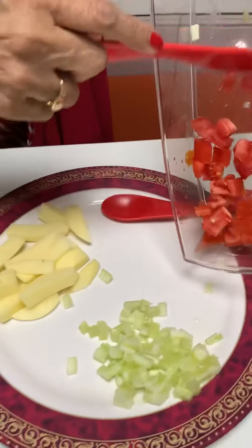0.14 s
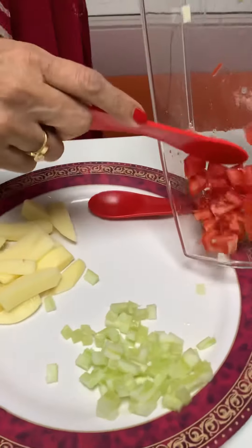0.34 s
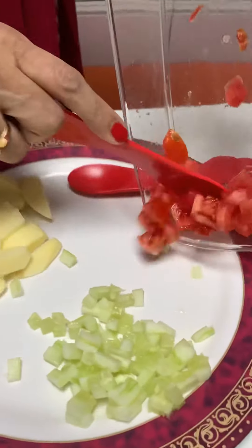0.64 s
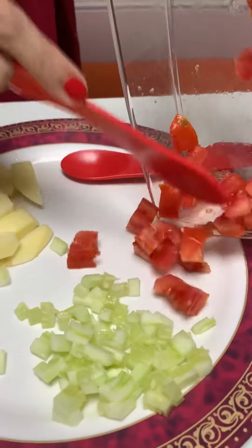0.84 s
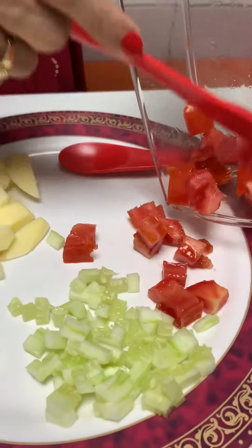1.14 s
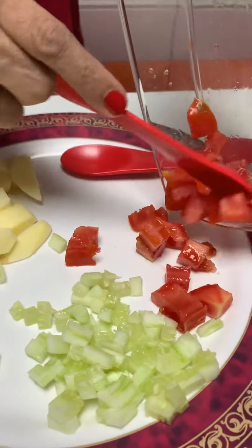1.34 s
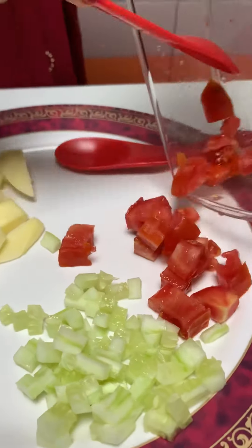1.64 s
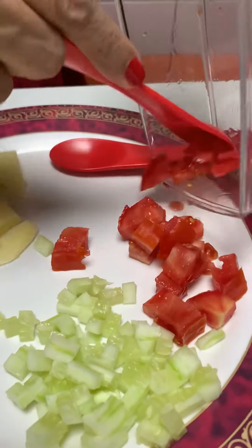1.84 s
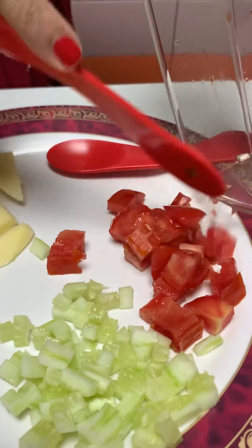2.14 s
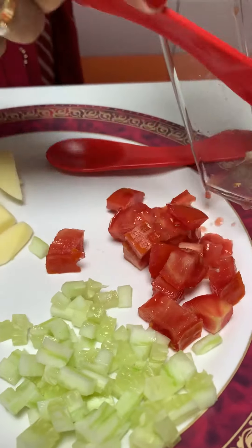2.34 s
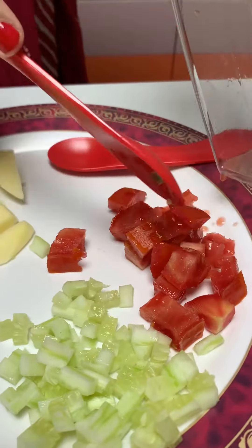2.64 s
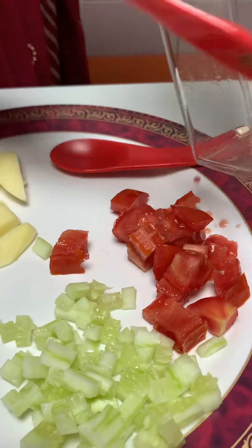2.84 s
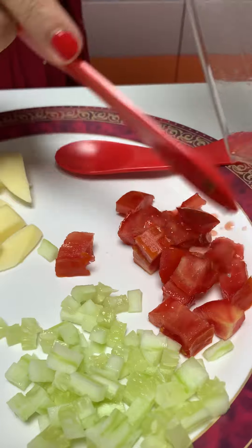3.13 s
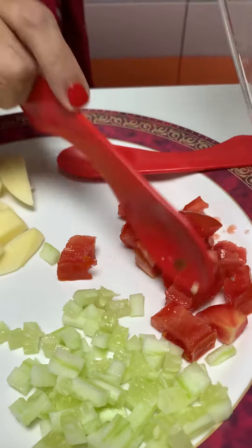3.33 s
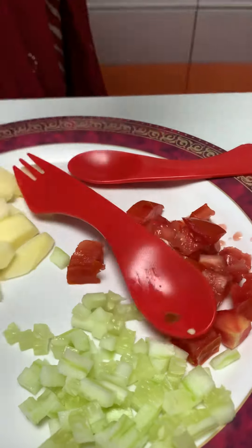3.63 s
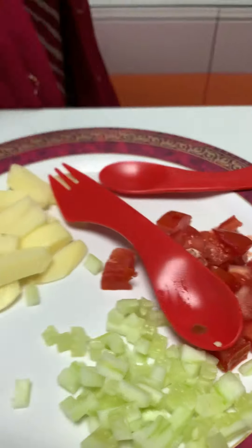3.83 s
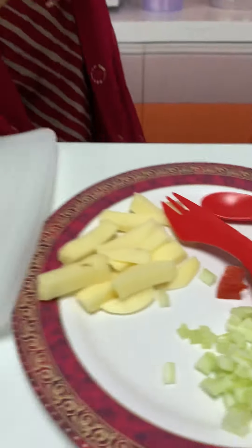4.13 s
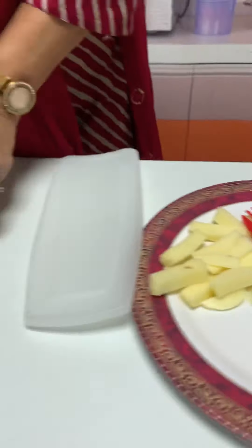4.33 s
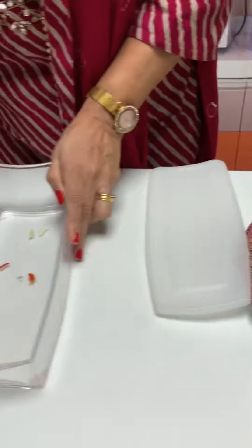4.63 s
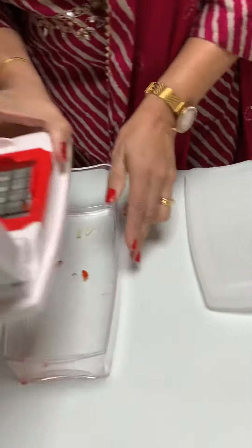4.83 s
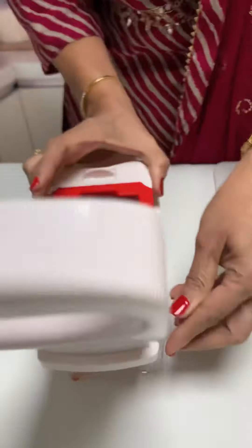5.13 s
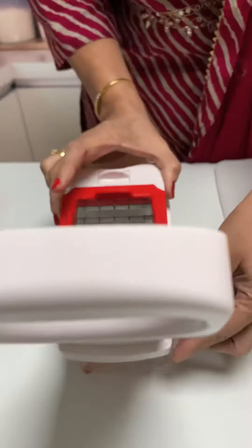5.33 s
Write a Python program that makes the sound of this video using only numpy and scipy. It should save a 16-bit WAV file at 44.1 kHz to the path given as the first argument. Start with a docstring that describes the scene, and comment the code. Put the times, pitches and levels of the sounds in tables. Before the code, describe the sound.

A plastic fork knocks and scrapes inside a thin plastic box in a quiet kitchen, then the box slides and thumps on a table.

```python
"""A small quiet kitchen, a phone held close: shaped noise for the air, narrow noise bands for drone and hum.
A plastic fork knocks and scrapes inside a thin clear plastic box while diced food slides onto a plate:
blows ring the modes of the walls, friction is noise heard through them, and soft pops are short pulses.
The box is then pushed over a table top, whose low resonances boom and which judders at a gliding rate.
It is set down with broad dull bumps and a lid lands on it; decaying noise adds the room's reverberation."""
import sys
import numpy as np
from scipy import signal
from scipy.fft import rfft, irfft
from scipy.io import wavfile
from scipy.ndimage import uniform_filter1d

SR = 44100
rng = np.random.default_rng(int(sys.argv[2]) if len(sys.argv) > 2 else 0)


def wav_record(signal):
    """Record a signal, one row per channel, as 16-bit PCM in the file named by sys.argv[1]."""
    frames = np.transpose(np.atleast_2d(signal))
    bounded = np.clip(frames, -1, 1)
    # unit amplitude maps onto the largest positive 16-bit level
    quanta = np.round(bounded * 32767).astype(np.int16)
    wavfile.write(sys.argv[1], SR, quanta)


def gain_from_decibels(decibels):
    """Convert decibel values to linear amplitude factors."""
    exponent = np.asarray(decibels, float) / 20
    return 10 ** exponent


N = 241303
TIME = np.arange(N) / SR  # s
SIDES = np.array([[1], [-1]])  # left, right

# nominal modes of the plastic box: [f/Hz, relative level/dB, decay time t60/s]
BOX_MODES = [(373.4, -2, 0.11), (437.3, 0, 0.12), (506, 0.5, 0.11), (560, -22, 0.2), (675.1, -2, 0.16),
             (774, -7.5, 0.077), (904.5, -5.5, 0.078), (960, -2.5, 0.12), (1007, -10.5, 0.13),
             (1047, -11, 0.069), (1134, -28.5, 0.14), (1263, -10, .1), (1396, -12.5, 0.23),
             (1519, -3, 0.084), (1595, -7.5, 0.061), (1713, -2, 0.1), (1850, -12.5, 0.13),
             (2000, -4, 0.065), (2176, -4.5, 0.14), (2351, -3, 0.029), (2598, -11, .05), (2903, -10, 0.013),
             (3183, -5, 0.11), (3556, 4, 0.011), (3820, -11, 0.14), (4080, -3.5, 0.064), (4460, -4, 0.044)]


def read(points, hz):
    """Piecewise-linear interpolation of a (f/Hz, value) table on a logarithmic frequency axis."""
    p = np.array(points, float)
    return np.interp(np.log(hz + 1), np.log(p[:, 0] + 1), p[:, 1])


def unit(x):
    """Normalization to an rms value of 1."""
    return x / np.sqrt(np.mean(x ** 2))


def coloured(points, size=N):
    """Spectral shaping: white noise filtered to a (f/Hz, level/dB) spectrum, rms 1."""
    hz = np.fft.rfftfreq(size, 1 / SR)
    white = rfft(rng.standard_normal(size))
    return unit(irfft(white * gain_from_decibels(read(points, hz)), size))


def resonant(hz, width_hz):
    """Resonance: white noise through one peak, width_hz wide at half amplitude, rms 1."""
    f = np.fft.rfftfreq(N, 1 / SR)
    peak = 1 / (1 + (2 * (f - hz) / width_hz) ** 2)
    return unit(irfft(rfft(rng.standard_normal(N)) * peak, N))


def walk(rate):
    """Slow random modulation: a new level, spread near 1, every 1 / rate s, joined by straight ramps."""
    k = int(SR / rate)
    held = np.repeat(rng.standard_normal(N // k + 1), k)
    return uniform_filter1d(held, k)[:N]


def curve(points, column):
    """Envelope: gain over time from a dB column, practically silent outside the table."""
    p = np.array(points)
    return gain_from_decibels(np.interp(TIME, p[:, 0], p[:, column], left=-120, right=-120))


def add(out, s, sound):
    """Superposition: mixes a short sound in at time s."""
    i = int(s * SR)
    out[:, i:i + sound.shape[-1]] += sound[..., :N - i]


def background(apart=.18):
    """Stationary noise and narrow-band noise: kitchen air, faint drone and wavering hum, nearly alike on both sides."""
    # spectrum of the air noise: [f/Hz, relative level/dB]
    air_spectrum = [(12, -59), (20, -29), (55, -4.5), (77, -6), (91, -20), (108, -10.5), (200, -7.5),
                    (230, -25), (289, -3.5), (361, -33.5), (3230, -58), (13900, -56), (16500, -67)]
    # level of the low hum over time: [t/s, level/dB]
    hum_level = [(0.0, -40), (.2, -52), (.6, -56), (.76, -45), (.94, -51), (1.2, -41.5), (1.4, -49.5),
                 (2.05, -44.5), (2.5, -57.5), (3.5, -55), (4.4, -70), (4.74, -47), (5.2, -60),
                 (5.47, -54.5)]
    air = coloured(air_spectrum) + apart * SIDES * coloured(air_spectrum)
    air = gain_from_decibels(-51 + 1.3 * walk(5.9)) * air
    drone = gain_from_decibels(-61) * resonant(287, width_hz=73)
    hum = resonant(65, width_hz=33) * curve(hum_level, column=1) * gain_from_decibels(3.0 * walk(3.1))
    return air + drone + hum


def table_top():
    """Forced and free vibration: jolts ring the low resonances, dragging drives judder and shakes them too."""
    # resonances of the table top: [f/Hz, width/Hz, relative level/dB]
    resonances = [(114.06, 3.1, 1.5), (142, 14, -4.5), (154, 4.7, -5.5), (205.6, 51, -5.5)]
    # judder of the box dragged over the table, slowing on the whole: [t/s, judder f/Hz, level/dB]
    judder = [(4.12, 158.6, -58), (4.15, 159.8, -46), (4.196, 140.8, -54.5), (4.43, 141.8, -35),
              (4.464, 137.5, -42.5), (4.492, 135.8, -31), (4.53, 137, -32.5), (4.548, 128.2, -31),
              (4.574, 119, -45), (4.62, 119.1, -45)]
    # booms when the box jolts or leans on the table: [t/s, level/dB before mode gains, fade/s, favoured f/Hz]
    jolts = [(.01, -44, .06, 110), (.06, -40.5, .04, 110), (.19, -44, .03, 190), (0.392, -41, .04, 150),
             (0.549, -49.5, .08, 130), (0.708, -38, .25, 202), (1.299, -47.5, .15, 115),
             (1.441, -47, .05, 190), (1.589, -38.5, .03, 120), (1.82, -40.5, .04, 190),
             (2.352, -53.5, .1, 150), (2.94, -43, .04, 130), (3.24, -51.5, .1, 120),
             (3.72, -58.5, .06, 130), (4.13, -45, 0.1, 195), (4.461, -40.5, .1, 112),
             (4.651, -29, 0.13, 150.8), (4.85, -45.5, 0.068, 115), (5.2, -57, 0.054, 190),
             (5.34, -20.5, .3, 152.6)]
    rise_s, reach_octaves, rest_db = .008, 1, -63

    drag = curve(judder, column=2)
    judder_hz = np.interp(TIME, *np.transpose(judder)[:2]) * (1 + .02 * walk(25))
    out = np.sqrt(2) * drag * np.sin(2 * np.pi * np.cumsum(judder_hz) / SR)

    shaken = unit(sum(gain_from_decibels(db) * resonant(hz, width) for hz, width, db in resonances))
    out += shaken * (gain_from_decibels(-7) * drag + gain_from_decibels(rest_db))

    hz, _, mode_db = np.transpose(resonances)
    for s, db, fade_s, favoured_hz in jolts:
        t = TIME[:min(SR // 2, N - int(s * SR))]
        tune, turn = rng.standard_normal((2, len(hz)))
        gain = gain_from_decibels(db + mode_db) * np.exp(-(np.log2(hz / favoured_hz) / reach_octaves) ** 2)
        phase = 2 * np.pi * np.outer(hz * (1 + 0.017 * tune), t) + np.pi * turn[:, None]
        rings = gain @ np.sin(phase)
        # the straight factor reaches zero at 0.5 s
        envelope = (1 - np.exp(-t / rise_s)) * np.exp(-t / fade_s) * (1 - 2 * t)
        add(out[None], s, envelope * rings)
    return out


def pressure():
    """Contact force as gain of walls and hiss: each stroke touches, presses harder, eases and lets go."""
    # strokes of fork, food and fingers over plastic:
    # [start t/s, firmest t/s, end t/s, walls level/dB, wet hiss level/dB]
    strokes = [(0.014, .14, 0.29, -40.5, -48.5), (0.25, .33, 0.48, -51.5, -59.5),
               (0.388, 0.424, 0.62, -53.5, -56.5), (0.556, .65, 0.96, -53.5, -64),
               (1.175, 1.26, 1.437, -44, -52), (1.518, 1.62, 2.07, -51.5, -62.5),
               (1.72, 1.8, 1.85, -53, -48.5), (1.908, 1.98, 2.09, -62.5, -57),
               (1.988, 2.07, 2.055, -71.5, -54.5), (3.29, 3.38, 3.44, -61, -46.5),
               (3.45, 3.68, 4.04, -61, -67.5), (4.0, 4.34, 4.96, -59.5, -68.5),
               (4.802, 5.1, 5.45, -57.5, -67), (5.19, 5.33, 5.45, -54.5, -70)]
    start_db, end_db = -17.5, -14  # pressure at both ends of a stroke
    lift_s = 0.032  # time to touch and to let go
    resting_db = np.array((-73, -89.5))  # hands that merely hold on: walls, hiss
    out = gain_from_decibels(resting_db)[:, None] * np.ones(N)
    for start, firm, end, *db in strokes:
        touch = np.clip(np.minimum(TIME - start, end - TIME) / lift_s, 0, 1)
        press = gain_from_decibels(np.interp(TIME, [start, firm, end], [start_db, 0, end_db]))
        out += gain_from_decibels(np.array(db))[:, None] * touch * press
    return out


def box_peaks(size, blur, between):
    """Modal frequency response: widened box modes of equal height over a floor gain, for a sound this long."""
    f = np.fft.rfftfreq(size, 1 / SR)
    return between + sum(1 / (1 + ((f - hz) * t60 / blur) ** 2) for hz, _, t60 in BOX_MODES)


def walls(x):
    """Structural filtering: steady rubbing heard through the modes of the box, rms 1."""
    return unit(irfft(rfft(x) * box_peaks(N, blur=1.6, between=.3), N))


def scrape(slip_db=2.0, apart=.6, grit_db=3.0):
    """Friction noise with uneven slips: the walls answer with body, the wet surface with gritty hiss."""
    # rubbing force on the walls: [f/Hz, relative level/dB]
    body_spectrum = [(300, -30), (450, 7.5), (800, -1), (1500, 2), (2100, 0.5), (2700, -9), (3400, -4.5),
                     (4100, -0.5), (4700, -3.5), (6000, -42)]
    # wet surface: [f/Hz, relative level/dB]
    hiss_spectrum = [(2350, -30.5), (4000, -10.5), (4190, -49.5), (5380, -6.5), (6580, -3.5),
                     (10300, -10.5), (12200, -25.5), (13100, -17.5), (15200, -17.5), (16200, -17),
                     (16500, -40.5)]
    on_walls, wet = pressure()
    rubbing = coloured(body_spectrum) + apart * SIDES * coloured(body_spectrum)
    body = walls(rubbing) * gain_from_decibels(slip_db * walk(45)) * on_walls
    hiss = coloured(hiss_spectrum) * gain_from_decibels(slip_db * walk(30) + grit_db * walk(280)) * wet
    return body + hiss


def burst(points, rise_s, fall_s, t):
    """Transient noise: a short burst shaped to a (f/Hz, level/dB) spectrum, and its lead time in s."""
    shape = (1 - np.exp(-t / rise_s)) * np.exp(-t / fall_s)
    lead = SR // 200  # room for the filter to ring ahead of the onset
    puff = np.roll(shape * rng.standard_normal(len(t)), lead)
    gain = gain_from_decibels(read(points, np.fft.rfftfreq(len(t), 1 / SR)))
    gain = gain / np.sqrt(np.mean(gain ** 2))
    return irfft(rfft(puff) * gain, len(t)), lead / SR


def ring(strike, t, rise_s, scatter_db=3.0, detune=0.0073, split=0.019, twin_db=-4.5, apart=0.7):
    """Modal synthesis: decaying sines after a blow of (f/Hz, level/dB) colour, each beating with a twin."""
    hz, db, t60 = (np.tile(c, 2) for c in np.transpose(BOX_MODES))
    size, tune, turn, side = rng.standard_normal((4, len(hz)))
    is_twin = np.repeat([0, 1], len(BOX_MODES))
    hz = hz * (1 + detune * tune + split * is_twin * np.sign(tune))
    gain = gain_from_decibels(read(strike, hz) + db + twin_db * is_twin + scatter_db * size)
    # the modes reach the two sides unequally, the low ones less so
    gain = gain * (1 + apart * np.clip(hz / 900, 0, 1) * SIDES * side)
    # each mode swells in smoothly, the low ones slowest: almost at once after a knock,
    # over some ms after a bump; rise_s holds at 1 kHz
    rise = (1 - np.exp(-t[:, None] * hz / 1000 / rise_s)) ** 2
    fade = np.exp(-np.log(1000) * t[:, None] / t60) * rise
    return gain @ (fade * np.sin(2 * np.pi * t[:, None] * hz + np.pi * turn)).T


def colour_of(ends_hz, low_db, high_db, hz, db, reach):
    """Excitation spectrum: a slope from bass to treble, on which the spot struck favours one pitch."""
    f = np.geomspace(*ends_hz, 19)
    slope = [(ends_hz[0], low_db), (ends_hz[1], high_db)]
    lift = (db - read(slope, hz)) * np.exp(-(np.log2(f / hz) / reach) ** 2)
    return list(zip(f, read(slope, f) + lift))


def blow(out, s, strike, t, rise_s, rattle_s, rattle_db):
    """Impact excitation: one contact rings the box and rattles briefly, in like colour, through its walls."""
    colour = [(200, -90)] + strike + [(5400, strike[-1][1] - 12), (9000, -110)]
    rattle, lead_s = burst(colour, rise_s / 2, rattle_s, t)
    rattle = irfft(rfft(rattle) * box_peaks(len(t), blur=3.32, between=0.57), len(t))
    rattle = rattle * np.clip((t[-1] - t) / .1, 0, 1) ** 4
    add(out, s, ring(strike, t, rise_s))
    add(out, s - lead_s, gain_from_decibels(max(db for _, db in strike) + rattle_db) * rattle)


def knocks():
    """Hard impact: the short contact of the tines gives a sharp crack, then the box rings by where it lands."""
    # fork, last the lid, against the box; levels colour the blow:
    # [t/s, level at 430 Hz/dB, level at 3.4 kHz/dB, favoured f/Hz, its level/dB, its reach/octaves]
    hard_blows = [(0.053, -23, -23.5, 1040, -10.5, 0.44), (0.159, -19.5, -33.5, 1050, -13, 0.29),
                  (0.303, -47, -43.5, 790, -28, 0.19), (0.428, -55, -51.5, 742, -36.5, 0.4),
                  (0.472, -51, -52, 1500, -47.5, 1), (0.532, -36.5, -44.5, 1100, -39.5, 0.39),
                  (0.675, -51.5, -53.5, 1850, -46, .4), (0.698, -28, -41, 1510, -32, .6),
                  (0.784, -48.5, -55.5, 1800, -52, .4), (1.087, -58, -77, 1310, -54.5, 0.44),
                  (1.215, -37.5, -25.5, 2000, -21.5, 1), (1.314, -44.5, -49, 705, -36, 0.33),
                  (1.502, -64, -68.5, 1940, -53.5, 0.33), (1.582, -24, -15.5, 860, -14.5, 0.28),
                  (1.59, -28, -21, 970, -15, 0.15), (1.827, -29.5, -38.5, 1660, -26.5, 0.64),
                  (1.916, -50, -51.5, 1930, -37.5, 0.25), (1.939, -52.5, -50.5, 750, -51.5, 0.36),
                  (1.973, -54, -58.5, 1033, -57.5, .4), (2.057, -45, -55, 1800, -38.5, 0.73),
                  (2.132, -58.5, -68.5, 1953, -53.5, .3), (2.394, -25, -15, 850, -12, 0.63),
                  (2.459, -43, -44.5, 997, -33.5, 0.62), (2.946, -31.5, -12.5, 1714, -9, 0.26),
                  (2.953, -31.5, -22, 750, -19.5, 0.62), (3.43, -56, -53.5, 1080, -39.5, 0.34),
                  (5.339, -43, -43.5, 648, -26, .2)]
    # crack of the contact: [f/Hz, relative level/dB]
    crack_spectrum = [(2350, -24.5), (4000, -9.5), (5120, -1.5), (5980, -3), (8780, -8.5), (10500, -9),
                      (12600, -19), (15200, -14.5), (16000, -19.5), (16800, -48.5)]
    out, t = np.zeros((2, N)), np.arange(SR // 5) / SR
    for s, *colour in hard_blows:
        strike = colour_of((430, 3400), *colour)
        blow(out, s, strike, t, rise_s=0.00017, rattle_s=0.0059, rattle_db=0.0)
        crack, lead_s = burst(crack_spectrum, 0.0001, 0.0034, t)
        add(out, s - lead_s, gain_from_decibels(colour[1] + 8.5) * crack)
    return out


def plops(cycles=0.6):
    """Heavily damped pulse: a soft push of about one cycle, a cosine under a Gaussian envelope."""
    # food dropping and fingertips landing: [t/s, level/dB before the 8 dB added below, f/Hz]
    soft_pops = [(1.017, -47, 544), (1.442, -38.5, 487), (2.343, -40.5, 367), (2.364, -44.5, 697),
                 (2.734, -53.5, 526), (3.243, -37, 506), (3.726, -48.5, 373), (3.762, -46.5, 467),
                 (3.774, -50.5, 350), (4.054, -52.5, 372), (4.151, -48, 458), (4.199, -51.5, 526),
                 (4.261, -52, 540), (4.326, -52, 385), (4.879, -44.5, 452)]
    out, t = np.zeros((2, N)), np.arange(-SR // 100, SR // 100) / SR
    for s, db, hz in soft_pops:
        pulse = np.exp(-(t * hz / cycles) ** 2) * np.cos(2 * np.pi * hz * t)
        # the crest comes one period after s
        add(out, s + t[0] + 1 / hz, gain_from_decibels(db + 8.0) * pulse)
    return out


def bumps():
    """Soft impact: a broad flat contact has a slower push, a longer chatter and no crack."""
    # box on the table and the lid; levels colour the blow:
    # [t/s, level at 430 Hz/dB, level at 2.2 kHz/dB, favoured f/Hz, its level/dB, its reach/octaves]
    dull_blows = [(4.105, -55.5, -62, 1090, -47.5, 0.64), (4.298, -59.5, -43, 1455, -37.5, 0.29),
                  (4.429, -66, -86.5, 1320, -54.5, 0.45), (4.455, -32, -82.5, 680, -42.5, 0.25),
                  (4.647, -17.5, -28.5, 1127, -14, .7), (4.818, -45.5, -83, 933, -54, 0.55),
                  (5.341, -36.5, -51.5, 1310, -30, 0.45), (5.449, -58, -54.5, 647, -33, 0.34)]
    out, t = np.zeros((2, N)), np.arange(SR // 5) / SR
    for s, *colour in dull_blows:
        # by 3 kHz the level is 17.5 dB below the 2.2 kHz column
        strike = colour_of((430, 2200), *colour) + [(3000, colour[1] - 17.5)]
        blow(out, s, strike, t, rise_s=0.00453, rattle_s=0.022, rattle_db=-3.5)
    return out


def room(x):
    """Reverberation: convolution with decaying noise bands, part of which differs between the two sides."""
    # reverberant bands: [centre f/Hz, decay time t60/s, level/dB]
    reverb_bands = [(245.6, 0.46, -16), (524, 0.29, -25), (930, 0.4, -25), (2000, 0.32, -23.5),
                    (3720, 0.23, -22.5), (7450, 0.31, -23), (14200, 0.095, -23.5)]
    apart = 0.58
    t = np.arange(SR // 2 + SR // 4) / SR
    tails = np.zeros((2, len(t)))
    for hz, t60, db in reverb_bands:
        octave = [(hz / 2, -40), (hz / np.sqrt(2), -3), (hz, 0), (hz * np.sqrt(2), -3), (hz * 2, -40)]
        fade = np.exp(-np.log(1000) * t / t60) * np.clip(t / 0.0047, 0, 1)
        fade /= np.sqrt(np.sum(fade ** 2))
        noise = coloured(octave, size=len(t)) + apart * SIDES * coloured(octave, size=len(t))
        tails += gain_from_decibels(db) * fade * noise
    return signal.fftconvolve(x[None], tails, axes=1)[:, :N]


def scene():
    """Superposition of the direct sound near the phone, its reverberation, the table top and the background."""
    near = knocks() + bumps() + scrape() + plops()
    return near + room(near.mean(axis=0)) + table_top() + background()


def band_limit(x):
    """A steep low-pass at the top of the band."""
    return signal.sosfilt(signal.butter(12, 16970, fs=SR, output="sos"), x)


def record(dry):
    """Time and level differences between two ports a few centimetres apart: the left hears earlier."""
    # response common to both microphone ports: [f/Hz, gain/dB]
    mic_response = [(100, -5), (4300, -3), (4750, -4), (5200, -6.5), (5700, -1), (11000, -6.5), (12000, -8),
                    (13500, 3.5), (16000, -3.5)]
    # level difference of the ports, the right mostly louder: [f/Hz, left minus right/dB]
    port_balance = [(60, 0.5), (110, 3), (200, -1.5), (380, -1.5), (700, -2), (1290, -1), (2380, -3.5),
                    (4400, -0.5), (8120, 0.5), (15000, -0.5)]
    lag_s = 0.00012  # right behind left
    hz = np.fft.rfftfreq(N, 1 / SR)
    gain = gain_from_decibels(read(mic_response, hz) + SIDES * read(port_balance, hz) / 2)
    shift = np.exp(1j * np.pi * SIDES * hz * lag_s)  # half the lag on each side
    ports = irfft(rfft(dry) * (gain * shift), N)
    # the input stage rounds the loudest peaks
    mix = np.tanh(ports)
    return band_limit(mix)


dry = scene()
out = record(dry)
wav_record(out)
```